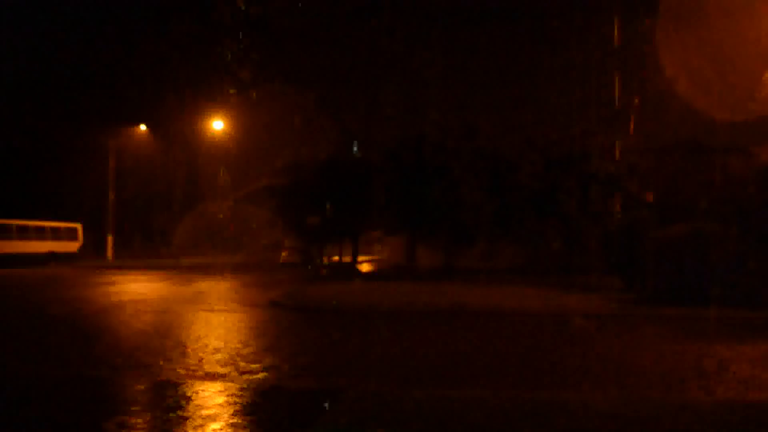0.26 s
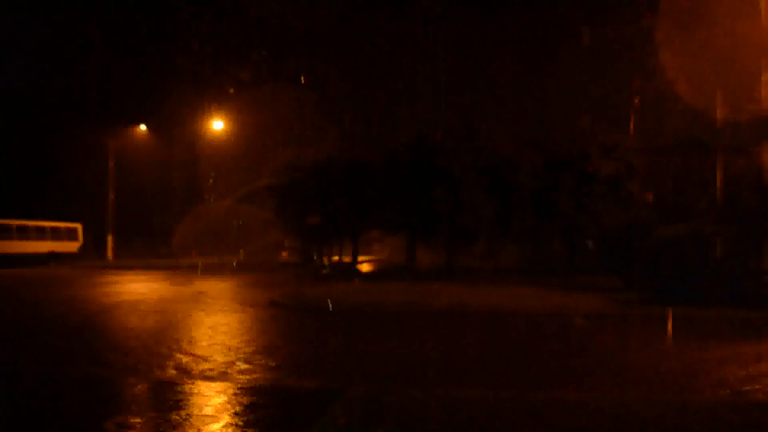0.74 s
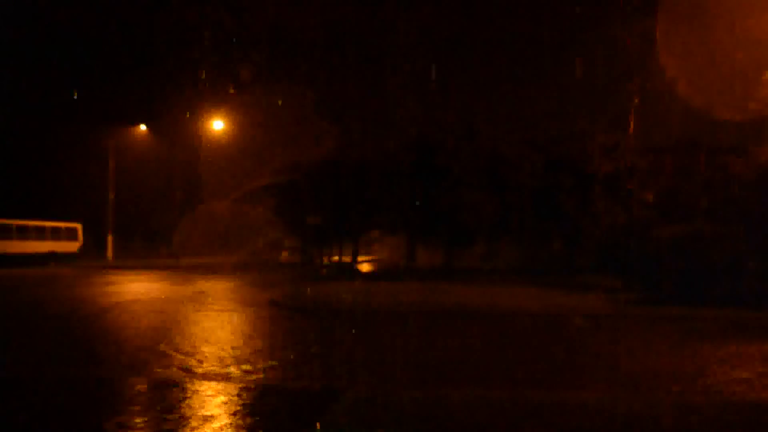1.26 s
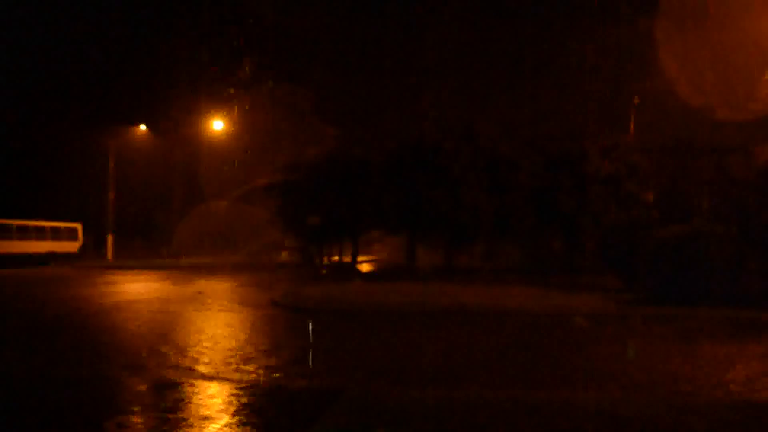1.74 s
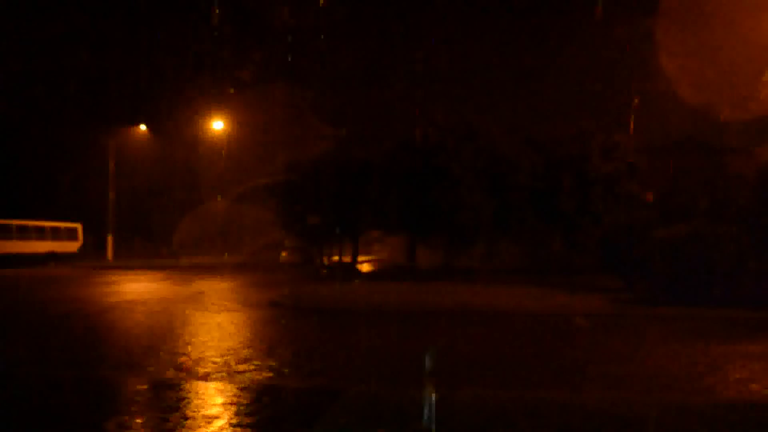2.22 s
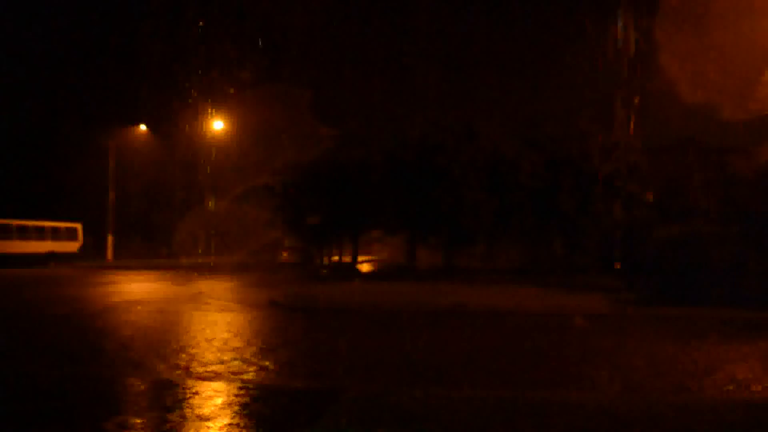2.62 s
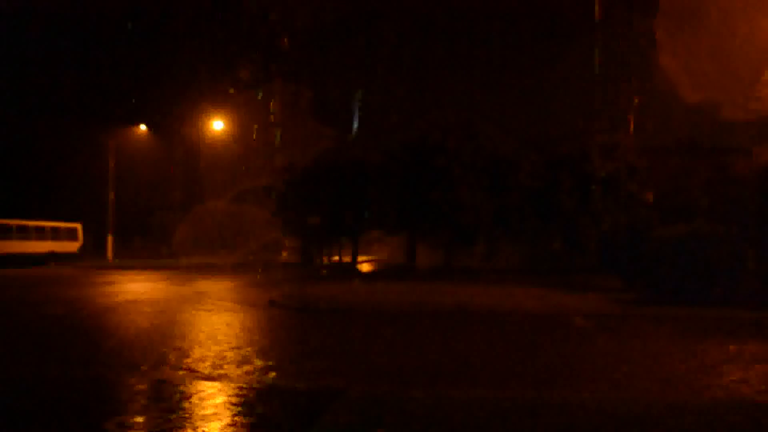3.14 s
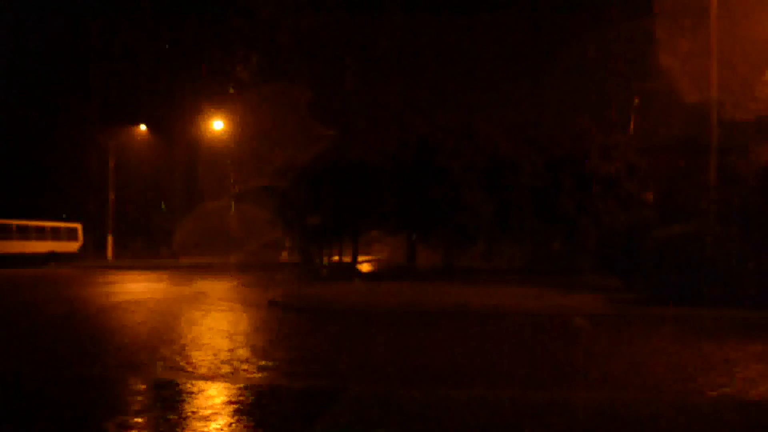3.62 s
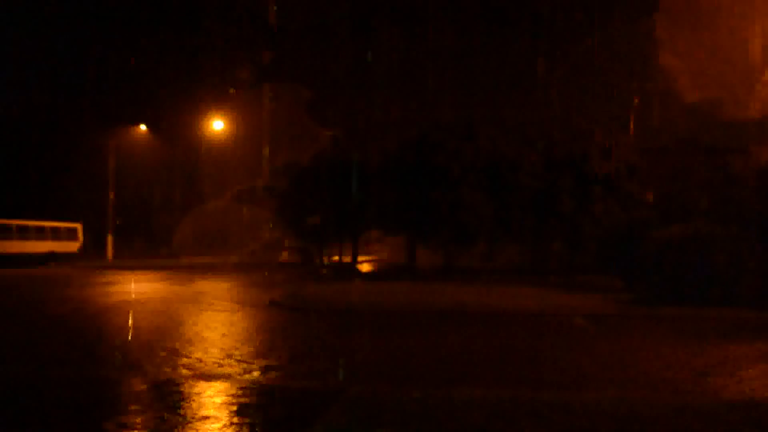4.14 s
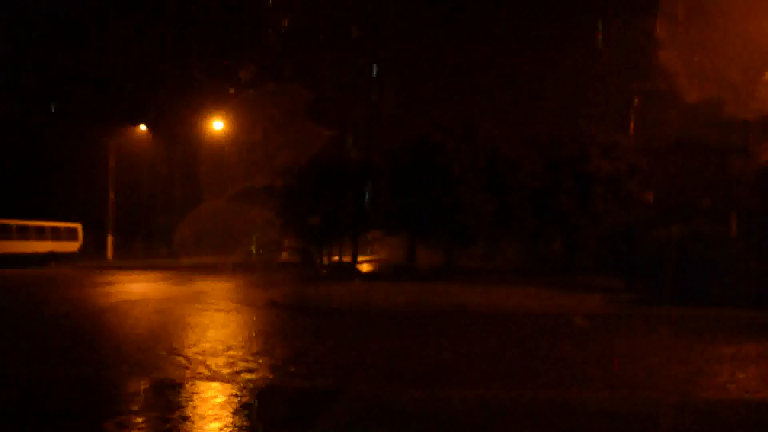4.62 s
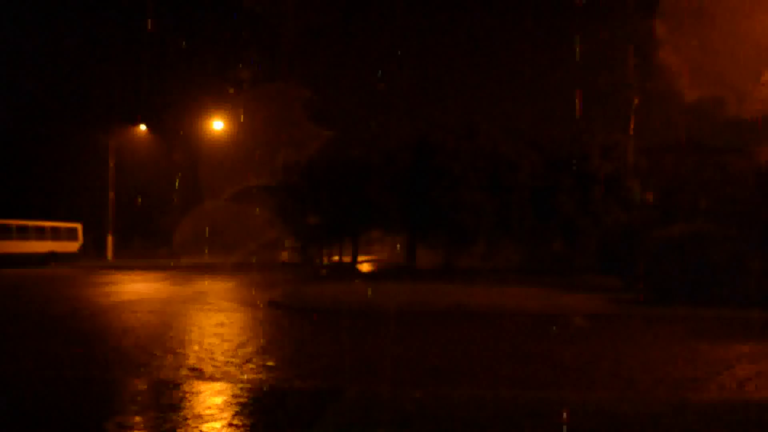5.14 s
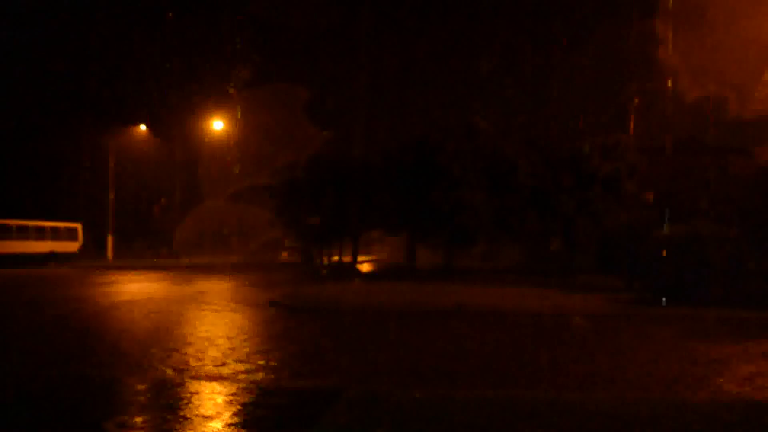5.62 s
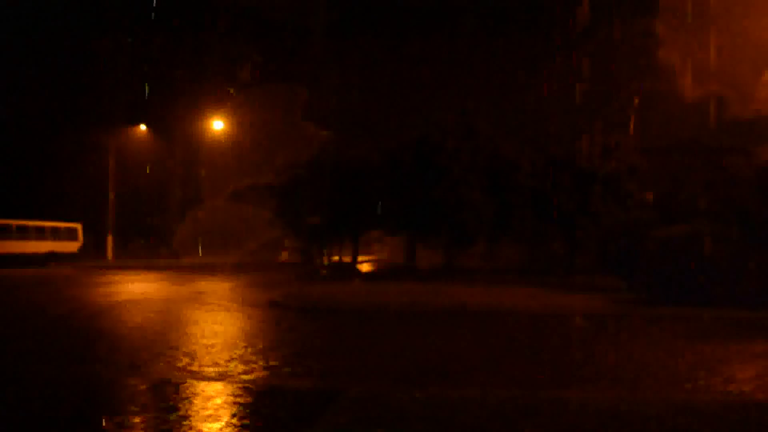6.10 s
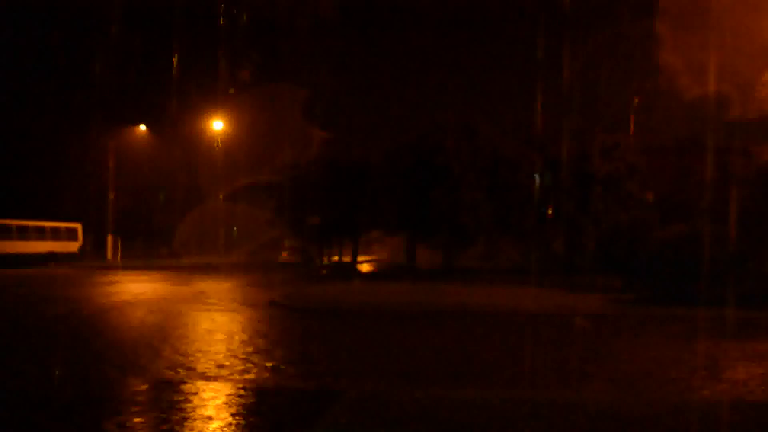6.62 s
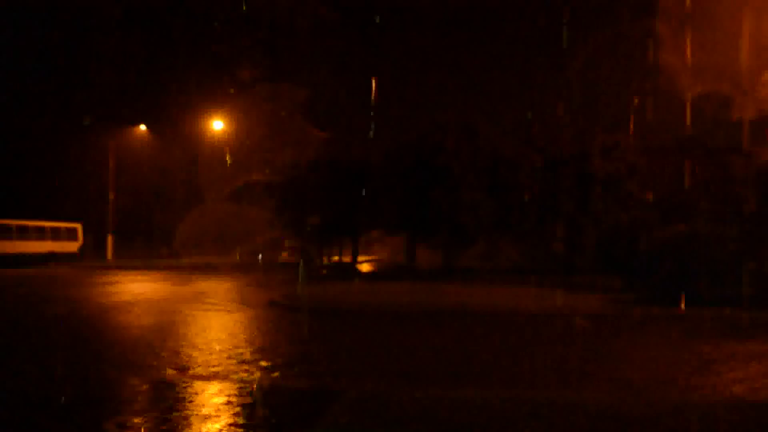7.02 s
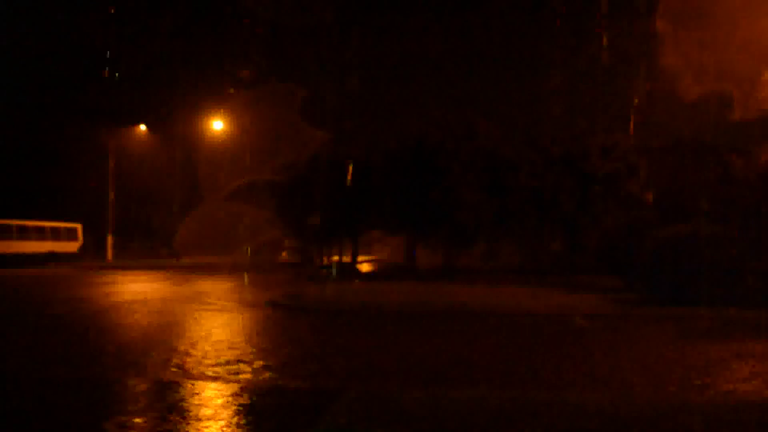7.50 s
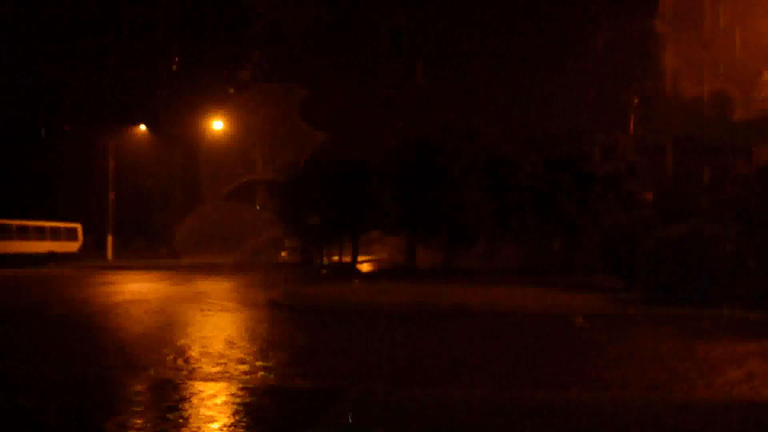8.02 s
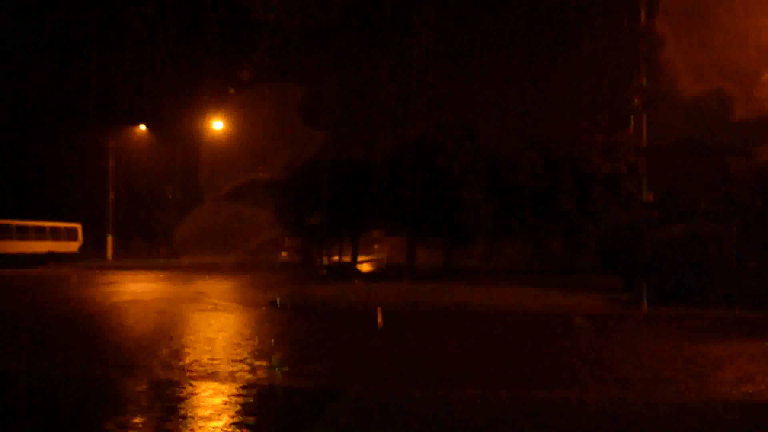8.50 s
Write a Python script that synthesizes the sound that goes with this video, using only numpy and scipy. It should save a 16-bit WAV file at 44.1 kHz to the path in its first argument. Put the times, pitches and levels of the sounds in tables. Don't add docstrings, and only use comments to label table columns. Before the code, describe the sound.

Heard from under a small shelter, distant rainfall stays constant while nearby drips crackle in front of it without rhythm. Heavier drops give a sharp mid-pitched smack with a little splash, some a blunt hollow plop in deep water, and lighter ones tick. Low wind pops touch the microphone around six to seven seconds. The small device sounds slightly boxy, lacking extreme treble.

```python
import sys
import numpy as np
from scipy import signal
from scipy.fft import rfft, irfft
from scipy.io import wavfile

SR = 44100
rng = np.random.default_rng(int(sys.argv[2]) if len(sys.argv) > 2 else 0)


def bounce(signal):
    frames = np.transpose(np.atleast_2d(signal))
    limited = np.clip(frames, -1, 1)
    pcm = np.round(limited * 32767).astype(np.int16)
    wavfile.write(sys.argv[1], SR, pcm)


def linear_from_db(decibels):
    return 10 ** (np.asarray(decibels, float) / 20)


N = 385875


def rms_one(x):
    return x / np.sqrt(np.mean(x ** 2) + 1e-20)


def in_time(rows):
    time_s, value = np.transpose(rows)
    return np.interp(np.arange(N) / SR, time_s, value)


def response(points, size):
    point_hz, point_db = np.transpose(points)
    bin_hz = np.maximum(np.fft.rfftfreq(size, 1 / SR), 1)
    return linear_from_db(np.interp(np.log(bin_hz), np.log(point_hz), point_db))


def band(x, hz, width_hz):
    r = np.exp(-np.pi * width_hz / SR)
    numerator = np.array([1, 0, -1]) * (1 - r * r) / 2
    return signal.lfilter(numerator, [1, -2 * r * np.cos(2 * np.pi * hz / SR), r * r], x)


def lowpass(x, order, hz):
    return signal.sosfilt(signal.butter(order, hz, fs=SR, output="sos"), x)


def highpass(x, hz):
    return signal.sosfilt(signal.butter(2, hz, "high", fs=SR, output="sos"), x)


def drift(rate_hz):
    r = np.exp(-2 * np.pi * rate_hz / SR)
    return rms_one(signal.lfilter([1], [1, -2 * r, r * r], rng.standard_normal(N + SR))[SR:])


def near(hz, spread):
    return hz * np.exp(spread * rng.standard_normal())


# (time [s], level [dB])
RAIN_LEVEL = [(0.0, -31.5), (3.58, -32), (4.09, -31), (5.82, -32.5), (8.14, -31.5), (8.75, -32.5)]
# (frequency [Hz], density [dB per Hz])
RAIN_COLOUR = [(25, -29), (120, -20), (267, -9.5), (749, -5.5), (900, -8.5), (1160, -6.5), (1750, -7),
               (2650, -4), (3010, -1), (3520, -4.5), (4650, -6), (12500, -7.5)]


def far_rain():
    drop_sizes = linear_from_db(6.9 * np.minimum(rng.exponential(1, N), 4.2)) * rng.choice([-1, 1], N)
    drops_per_s = 3000
    patter = rms_one(drop_sizes * (rng.random(N) < drops_per_s / SR))
    mixed = linear_from_db(-4.0) * patter + rng.standard_normal(N)
    hiss = irfft(rfft(mixed) * response(RAIN_COLOUR, N), N)
    return linear_from_db(in_time(RAIN_LEVEL) - 1.88 + 0.8 * drift(16.0)) * rms_one(hiss)


# (time [s], level [dB])
WIND_LEVEL = [(0, -57), (.3, -63), (3.3, -64.5), (4.2, -75), (5.9, -65), (6.1, -56), (6.4, -64), (7.0, -58),
              (7.45, -56), (7.6, -76), (8.45, -64.5), (8.6, -56), (8.75, -55)]
# (time [s], peak level [dB], frequency [Hz])
WIND_POPS = [(6.032, -39, 120), (6.047, -30, 150), (6.725, -43, 80), (6.902, -35, 330), (6.928, -37, 290),
             (6.994, -37, 110), (7.193, -30.5, 150), (7.222, -33, 60), (7.238, -28, 190),
             (7.292, -27.5, 192), (7.306, -36, 120), (8.567, -43, 90), (8.686, -43, 130)]


def wind():
    rumble = rms_one(band(rng.standard_normal(N), 51, 91))
    out = linear_from_db(in_time(WIND_LEVEL) - 1.5 + 4.0 * drift(6.0)) * rumble
    t = np.arange(SR // 20) / SR
    for time_s, peak_db, hz in WIND_POPS:
        start = round(time_s * SR)
        envelope = np.exp(-2.6 * hz * t) * (1 - np.exp(-14 * hz * t))
        out[start:start + len(t)] += linear_from_db(peak_db + 4.5) * np.sin(2 * np.pi * hz * t) * envelope
    return highpass(out, 35)


# (time [s], frequency [Hz], level [dB])
ENGINE = [
    (0, 79, -61),
    (.4, 82, -70),
    (1.1, 92, -70),
    (1.9, 92, -70),
    (2.9, 90, -70.5),
    (3.8, 85, -78),
    (4.3, 84, -85),
    (8.75, 84, -90),
]


def drone():
    time_s, hz, level_db = np.transpose(ENGINE)
    wavering_hz = in_time(np.c_[time_s, hz]) * (1 + 0.0101 * drift(1.24))
    angle = 2 * np.pi * np.cumsum(wavering_hz) / SR
    tone = np.sin(angle) + linear_from_db(-1.5) * np.sin(3 * angle)
    return np.sqrt(2) * linear_from_db(in_time(np.c_[time_s, level_db])) * tone


# (delay [ms], level [dB], favoured frequency [Hz], width [Hz])
WALL_ECHOES = [(2, -12.5, 940, 11400), (4.9, 8.5, 2700, 1300), (6, -12, 5000, 7900), (7.5, 3, 2300, 2000),
               (6.3, -6.5, 6300, 24000), (5.16, -5.0, 1500, 2200), (9.2, -10, 2480, 820),
               (11, -6, 2170, 1800), (14.3, -9.5, 2300, 1200)]


def shelter():
    first_arrival_db, screened_share = 0.2, 0.2
    scatter_db, scatter_t60_s = -26, 0.092
    t = np.arange(SR // 8) / SR
    click = 1.0 * (t == 0)
    out = linear_from_db(first_arrival_db) * (click - screened_share * band(click, 1900, 820))
    out = out + linear_from_db(scatter_db - 60 * t / scatter_t60_s) * rng.standard_normal(len(t)) * (t > .0006)
    for delay_ms, echo_db, hz, width_hz in WALL_ECHOES:
        echo_hz = near(hz, 0.049)
        echo = click
        for _ in range(3):
            echo = band(echo, echo_hz, width_hz)
        spot_db = 6.6 * (rng.random() - .5)
        out = out + linear_from_db(echo_db + spot_db) * np.roll(echo, round(delay_ms * SR / 1000))
    return out


def impact(hz):
    t = np.arange(SR // 16) / SR
    swell_s = 0.0044
    swell = (t / swell_s * np.exp(1 - t / swell_s)) ** 2
    spray = linear_from_db(7.0 * rng.standard_normal(len(t))) * rng.standard_normal(len(t)) * swell
    spray_db = np.interp(hz, [2500, 5500, 8000], [-44.0, -31.0, -25.0]) + 10.0 * (rng.random() - .5)
    click_db = np.interp(hz, [3000, 6000], [-1, -17])
    source = linear_from_db(spray_db) * spray + linear_from_db(click_db) * (t == 0)
    top_hz = min(hz * np.interp(hz, [1200, 2700, 5000], [2.0, 1.4, 1.6]), .45 * SR)
    width_hz = hz * np.interp(hz, [1200, 2700, 6000], [.7, .72, .7])
    soft = lowpass(signal.fftconvolve(source, shelter()), 3, top_hz)
    heard = highpass(band(soft, hz, width_hz), 0.48 * hz)
    return heard / np.sqrt(np.mean(heard[:530] ** 2))


PITCHES_HZ = np.geomspace(1000, 9500, num=40)


def strike(time_s, level_db, hz):
    spots = 4
    nearest = np.argmin(np.abs(np.log(hz[:, None] / PITCHES_HZ)), axis=1)
    heard = [[impact(pitch_hz) for pitch_hz in PITCHES_HZ] for _ in range(spots)]
    starts = np.round(time_s * SR).astype(int)
    out = np.zeros(N + SR)
    for turn, (start, gain, pitch) in enumerate(zip(starts, linear_from_db(level_db), nearest)):
        one = heard[turn % spots][pitch]
        out[start:start + len(one)] += gain * one
    return out[:N]


def tiny_drips():
    time_chance, level_chance, pitch_chance = rng.random((900, 3)).T
    level_db = -45.0 - 4.9 * np.log(level_chance + 0.2)
    return np.array([time_chance * (N - 1) / SR, level_db, 1700 * 5.5 ** pitch_chance])


# (time [s], rms level [dB], centre [Hz])
WEAK_PATTER = [(0.01, -36.5, 2100), (0.0846, -35.0, 2100), (0.1756, -33.5, 2700), (0.5525, -35.0, 2100),
               (0.5674, -36.5, 2100), (1.0172, -36.5, 2100), (1.2218, -37, 2100), (1.3316, -34, 2100),
               (1.3729, -35, 2700), (1.447, -32.5, 2700), (1.5088, -34, 2700), (1.537, -37, 2100),
               (1.569, -34, 2700), (1.619, -35, 2100), (1.712, -34, 2700), (1.783, -34, 2700),
               (1.8856, -34.5, 2100), (2.393, -35, 2700), (2.5485, -33, 2700), (2.6552, -40, 2100),
               (2.7504, -37, 2100), (2.7623, -34, 2100), (2.8818, -36.5, 2100), (3.0339, -31, 2700),
               (3.2718, -35, 2700), (3.4848, -31.5, 2700), (3.5431, -35, 2700), (3.687, -38, 2100),
               (3.716, -31, 2100), (3.8874, -35, 2700), (4.057, -34, 2100), (4.2707, -37.0, 2100),
               (4.3352, -35, 2700), (4.6052, -32.5, 2700), (4.708, -32.5, 2100), (4.743, -33, 2700),
               (4.7906, -37.0, 2100), (4.9263, -31.5, 2700), (5.0226, -43, 2100), (5.0972, -34, 2100),
               (5.228, -34, 2100), (5.345, -34, 2700), (5.3598, -32.5, 2700), (5.486, -34.5, 2100),
               (5.5487, -32, 2700), (5.71, -33, 2700), (5.8992, -33, 2700), (5.9306, -37, 2100),
               (6.1627, -34, 2700), (6.3892, -34, 2700), (6.4563, -34.5, 2100), (6.577, -37, 2700),
               (6.593, -37, 2100), (7.024, -31, 2700), (7.0875, -33, 2700), (7.21, -35, 2700),
               (7.837, -36, 2100), (8.1784, -37.0, 2100), (8.2592, -37, 2100), (8.7226, -37, 2100),
               (0.0148, -36, 4500), (0.1654, -39, 4500), (0.2838, -30.5, 3500), (0.3728, -35, 4500),
                 (0.505, -38, 3500), (0.562, -35, 4500), (0.5836, -39, 5800), (0.791, -36, 5800),
                 (0.8694, -33, 4500), (0.944, -30.5, 4500), (1.1362, -32, 3500), (1.1805, -35, 3500),
                 (1.219, -40, 5800), (1.274, -33, 3500), (1.5467, -38, 4500), (1.6187, -35, 4500),
                 (1.8589, -37, 3500), (1.8997, -36, 3500), (2.1745, -37, 4500), (2.224, -35, 4500),
                 (2.2729, -37, 4500), (2.3834, -34, 4500), (2.429, -33.5, 5800), (2.4921, -35.5, 5800),
                 (2.6064, -37, 4500), (2.6508, -31, 4500), (2.786, -32.5, 4500), (2.9491, -35, 4500),
                 (3.1064, -34, 3500), (3.128, -34, 4500), (3.155, -35, 4500), (3.598, -34.0, 5760),
                 (3.716, -32, 5780), (3.982, -37, 4500), (4.135, -36, 5760), (4.161, -35, 5740),
                 (4.401, -36.0, 5850), (4.5434, -33, 3500), (4.851, -34, 5740), (4.866, -35, 3500),
                 (5.0975, -36, 5800), (5.1599, -33.5, 3500), (5.7715, -33, 3500), (5.975, -32.0, 4500),
                 (6.6246, -33, 4500), (6.741, -43, 5750), (7.1664, -36, 4500), (7.2437, -28.5, 2700),
                 (7.3066, -35, 3500), (7.5599, -32, 2700), (7.59, -31.5, 3500), (7.6944, -32.5, 2700),
                 (7.705, -37, 2700), (7.7609, -31.5, 3500), (7.9875, -33, 2700), (8.1627, -37, 4500),
                 (8.2716, -32, 3500), (8.3298, -32.5, 2700), (8.3503, -37, 3500), (8.6174, -36, 2700),
               (0.0185, -35.0, 9000), (0.167, -34, 9000), (0.1943, -35, 9000), (0.276, -36, 9000),
                  (0.285, -37.0, 7200), (0.652, -39, 7200), (0.8552, -35.5, 7200), (1.129, -33.5, 9000),
                  (1.3065, -37, 7200), (1.37, -36, 9000), (1.4164, -37, 7200), (1.5357, -38, 9000),
                  (1.7773, -33.5, 9000), (1.8341, -35.0, 9000), (1.8848, -39, 7200), (1.8991, -32, 9000),
                  (2.2242, -34.5, 9000), (2.341, -33, 9000), (2.58, -35, 7200), (2.7868, -36, 9000),
                  (2.8182, -37, 7200), (2.9576, -37, 9000), (3.0331, -37.0, 9000), (3.1758, -32, 7200),
                  (3.2433, -41, 7200), (3.3423, -34, 9000), (3.3556, -36.0, 9000), (3.4841, -33, 9000),
                  (3.8939, -35, 9000), (4.1023, -37, 7200), (4.2698, -39, 9000), (4.2819, -34, 9000),
                  (4.6005, -37, 7200), (4.6219, -31.5, 9000), (4.7832, -37, 7200), (4.8647, -39, 9000),
                  (5.3052, -39, 7200), (5.3553, -34.5, 7200), (5.4241, -36.5, 9000), (5.5438, -34, 9000),
                  (5.6154, -39, 9000), (6.2203, -39, 9000), (6.5397, -37, 9000), (6.6167, -36, 9000),
                  (6.9298, -37, 5800), (7.093, -34, 9000), (7.4345, -36, 9000), (7.5223, -35.0, 7200),
                  (7.5598, -34, 9000), (7.7922, -38, 5800), (7.833, -34, 5800), (7.9573, -39, 7200),
                  (7.9867, -37, 7200), (8.015, -36, 5800), (8.185, -35, 5800), (8.3204, -32, 9000),
                  (8.3932, -38, 5800), (8.6454, -36, 9000), (8.6703, -39, 7200), (8.7285, -36.0, 9000),
               (6.4402, -24, 4100), (4.2967, -28, 3700), (3.222, -29, 4600), (2.96, -34, 3200),
                 (7.5, -35, 8800), (1.294, -26.5, 2800), (0.328, -31, 4200), (6.4415, -28, 9400),
                 (6.862, -33, 9000), (4.305, -34.5, 9000), (6.115, -39, 6200)]


def weak_drips():
    return np.array(WEAK_PATTER).T


# (time [s], smack rms level [dB], smack [Hz], splash re smack [dB])
FAT_DRIPS = [(0.1415, -24.5, 2880, -7), (0.9605, -29, 2780, -1), (1.1667, -25.5, 2370, -17),
             (1.2852, -26, 2690, -25), (1.3087, -24.5, 2510, -20), (1.5563, -27.5, 2370, -8),
             (1.8209, -24, 2630, -13), (1.9395, -26.5, 2596, -9), (2.294, -22, 2800, -20),
             (2.713, -18.5, 2746, -17), (3.184, -26, 2770, -11), (3.222, -24, 2720, -4),
             (4.1685, -25.5, 2590, -10), (4.6997, -26.5, 2940, -5.5), (4.7628, -26, 2570, -6),
             (5.216, -28, 2510, -12), (5.2503, -25.5, 3020, -2), (5.6321, -25.5, 2540, -13),
             (5.692, -24.5, 2630, -13), (6.0651, -24, 2400, -28), (6.2051, -24.5, 2520, -8),
             (6.4409, -21.5, 2850, -7), (6.6991, -23.5, 2860, -3.5), (7.255, -25.5, 2680, -7.5),
             (7.3588, -26, 2710, -11), (7.6292, -23, 2720, -14), (7.733, -26.5, 2540, -22),
             (8.046, -25, 2550, -8.5), (8.5013, -26, 2610, -5), (8.6531, -25, 3050, -4.5)]
# (time [s], smack rms level [dB], splash re smack [dB], splash [Hz])
FILM_DRIPS = [(0.3183, -35, 1, 6000), (0.7585, -29.5, 0.5, 4700), (1.1082, -31.5, 1, 6630),
              (1.474, -27, -8, 8600), (1.983, -28, -1, 4750), (2.0907, -28.5, -3, 5200),
              (2.8284, -28.5, -2, 6000), (2.96, -29.5, -3.5, 5000), (4.0652, -37, 8.5, 5400),
              (4.239, -30, -1, 7600), (4.256, -29.5, -14, 5530), (4.297, -30.5, 1.5, 5600),
              (4.4145, -30.5, -2, 5200), (4.565, -28, -8, 8100), (4.904, -25.5, -3, 5140),
              (5.0003, -28.5, -3, 5600), (5.1278, -27.5, -6, 6800), (5.2636, -29, -2, 5800),
              (5.3146, -29.5, -4.5, 6150), (5.915, -29, 0, 5750), (6.6504, -27.5, -5.5, 4580),
              (6.667, -31, -3, 7500), (6.8983, -36, 3, 6400), (7.331, -28, -5, 6100),
              (7.5887, -35, -1, 6870), (7.9393, -28.5, -8, 5000), (8.206, -26.5, -5, 6650),
              (8.361, -30, -1.5, 8680), (8.434, -28, -4.5, 8000)]
# (time [s], smack rms level [dB], smack [Hz])
MIDDLING_DRIPS = [(0.357, -29, 2690), (0.445, -29, 2900), (0.4668, -28, 3460), (0.733, -30.5, 2260),
                  (0.818, -28.5, 3030), (0.9292, -27.5, 2900), (1.1806, -30, 2640), (1.42, -28.5, 3080),
                  (1.5845, -28.5, 2680), (1.7237, -26.5, 2560), (1.852, -30, 2400), (2.1768, -27.5, 2820),
                  (3.0603, -29, 2290), (3.529, -26, 2990), (3.5576, -30, 2700), (3.873, -29, 2600),
                  (3.9583, -28, 2910), (4.0106, -28, 2650), (4.2097, -27.5, 2910), (4.3526, -27.5, 2830),
                  (3.929, -30, 2390), (4.371, -30.5, 2230), (6.0034, -28.5, 2900), (7.014, -27, 2720),
                  (7.063, -29, 2630), (7.222, -28, 2320), (7.771, -31, 3300), (8.107, -29, 2390),
                  (8.3013, -29.5, 2910), (8.5249, -28.5, 2720)]
# (time [s], smack rms level [dB], smack [Hz], plop re smack [dB], splash re smack [dB])
PUDDLE_DRIPS = [(0.49, -23.5, 2130, -2.5, -10), (0.5106, -36, 1770, 10.5, 3), (0.558, -31, 2830, -11, -4),
                (0.944, -29.5, 2570, -8.5, -14), (1.9515, -28, 2560, -11, 0),
                (2.0702, -27.5, 2490, -10, -25), (2.514, -27.5, 3120, -17, -21),
                (2.527, -30.5, 2330, -12, -4), (2.9117, -27, 1900, -5, -10), (3.666, -28, 2750, -12, -7),
                (3.9072, -31.5, 2960, -7.5, 1), (4.086, -29.5, 2370, -5.5, -7),
                (4.135, -28.5, 2360, -11, -17), (4.964, -23, 2500, -9.5, -26), (5.0755, -27.5, 2030, -5, 2),
                (5.9803, -29, 2170, -8.5, -6), (6.8233, -25.5, 2200, -1, -11),
                (6.8672, -24.5, 2410, -5.5, 0), (6.9216, -28.5, 2040, -7.5, -6.5),
                (7.446, -29, 2450, -13, -3.5), (7.8158, -22, 2550, -16, -19), (8.185, -39, 2000, 0.5, 3),
                (8.3857, -29, 2610, -16, -6), (8.6702, -27.5, 2610, -13, -16)]


def heavy_drips():
    paving_splash_hz, puddle_splash_hz, film_smack_hz = 5600, 7200, 3050
    middling_splash_db = -9.5
    rows = [(s, db, hz, splash_db, near(paving_splash_hz, 0.18)) for s, db, hz, splash_db in FAT_DRIPS]
    rows += [(s, db, hz, middling_splash_db, near(paving_splash_hz, 0.24)) for s, db, hz in MIDDLING_DRIPS]
    rows += [(s, db, hz, splash_db, near(puddle_splash_hz, .1)) for s, db, hz, _, splash_db in PUDDLE_DRIPS]
    rows += [(s, db, near(film_smack_hz, .05), splash_db, hz) for s, db, splash_db, hz in FILM_DRIPS]
    time_s, smack_db, smack_hz, splash_db, splash_hz = np.transpose(rows)
    thock_db = -16 + 1 * rng.standard_normal(len(time_s))
    thock_hz = 1260 * np.exp(.06 * rng.standard_normal(len(time_s)))
    smacks = np.array([time_s, smack_db, smack_hz])
    thocks = np.array([time_s, smack_db + thock_db, thock_hz])
    splashes = np.array([time_s, smack_db + splash_db, splash_hz])
    return np.hstack([smacks, thocks, splashes])


# (time [s], rms level [dB], centre [Hz])
LIGHT_DRIPS = [(0.1754, -38, 6830), (0.6352, -33.5, 5750), (0.792, -31, 3600), (1.2626, -31, 8200),
               (1.334, -32.5, 5180), (1.799, -30, 3920), (2.188, -29.5, 4050), (2.4135, -32, 3400),
               (2.499, -33, 7200), (2.55, -34, 5000), (3.0338, -37, 4300), (3.1014, -32.5, 5000),
               (3.1259, -34, 8660), (3.4946, -33, 3300), (3.5124, -30.5, 8800), (3.623, -32, 5600),
               (3.648, -30.5, 7500), (3.738, -28.5, 3860), (3.8066, -31, 3510), (4.0318, -30, 3600),
               (5.4375, -29.5, 3900), (5.497, -33, 3450), (6.102, -29, 7700), (6.1617, -33, 4470),
               (6.22, -30.5, 3500), (6.3435, -32, 4700), (6.992, -30.5, 3600), (7.195, -35, 8180),
               (7.531, -30.5, 3400), (7.688, -31, 7500)]


def light_drips():
    return np.transpose(LIGHT_DRIPS)


# (time [s], centre [Hz])
SOFT_DRIPS = [(0.4217, 3970), (0.841, 4020), (1.049, 3600), (1.1984, 2680), (1.222, 3700), (1.393, 3060),
              (1.494, 4440), (2.0156, 2800), (2.15, 2600), (2.7677, 4000), (2.894, 4460), (4.525, 2700),
              (4.7484, 4400), (5.017, 4100), (5.0436, 3300), (5.548, 4750), (5.7833, 2800), (5.889, 3840),
              (6.0243, 3460), (6.409, 2900), (6.5338, 4040), (6.577, 3700), (6.84, 3300), (7.178, 3020),
              (7.4, 3400), (7.561, 4740), (7.651, 3740), (8.03, 3400), (8.123, 3500), (8.1466, 3920)]


def soft_drips():
    time_s, hz = np.transpose(SOFT_DRIPS)
    level_db = np.full(len(time_s), -32.5)
    return np.array([time_s, level_db, hz])


def drips():
    contacts = [heavy_drips(), light_drips(), soft_drips(), tiny_drips(), weak_drips()]
    return strike(*np.hstack(contacts))


# (delay [ms], level [dB], favoured frequency [Hz], width [Hz])
PLOP_RETURNS = [(2.2, -6, 1500, 1500), (5.2, -.5, 1130, 240), (5.6, 2, 2100, 600), (7.6, -.5, 1200, 260),
                (8.2, 0, 2100, 500), (13.5, -11, 1300, 600)]


def plops():
    plop_hz, plop_width_hz, plop_top_hz = 1380, 800, 2300
    time_s, smack_db, _, plop_db, _ = np.transpose(PUDDLE_DRIPS)
    t = np.arange(SR // 20) / SR
    out = np.zeros(N + SR)
    blunt = lowpass(1.0 * (t == 0), 2, plop_top_hz)
    for start, level_db in zip(np.round(time_s * SR).astype(int), smack_db + plop_db):
        pulse = band(blunt, near(plop_hz, .06), plop_width_hz)
        heard = pulse
        for delay_ms, echo_db, hz, width_hz in PLOP_RETURNS:
            echo = np.roll(band(pulse, hz, width_hz), round(delay_ms * SR / 1000))
            heard = heard + linear_from_db(echo_db + 2 * rng.standard_normal()) * echo
        out[start:start + len(t)] += linear_from_db(level_db) * heard / np.sqrt(np.mean(heard[:530] ** 2))
    return out[:N]


def scene():
    return -(far_rain() + wind() + drone() + drips() + plops())[None]


def low_pass(x):
    return signal.sosfilt(signal.butter(12, 15300, fs=SR, output="sos"), x)


# (frequency [Hz], width [Hz], level re direct [dB])
HOUSING_MODES = [(1073, 50, -1.5), (1186, 76, 2.5), (2075, 90, -6.5), (3330, 115, -4), (4247, 115, -0.5)]
# (frequency [Hz], share lost [0-1])
NARROW_DIPS = [(1292, 0.26), (2290, 0.25), (2850, 0.23), (3165, 0.53), (3410, 0.42), (3580, 0.19),
               (5020, 0.28)]
# (frequency [Hz], level [dB])
MIC_RESPONSE = [(6500, 1.5), (7300, -1), (7850, -5), (8500, 2), (9700, 1.5), (10500, -6), (11400, -17.5),
                (11750, -34), (12000, -70)]
# (frequency [Hz], level [dB])
MIRROR_LEAK = [(12000, -2), (13500, -14), (14500, -29), (15000, -37), (15400, -60)]


def record(dry):
    first_rate_hz, dip_width_hz = 24000, 70
    housed = dry + sum(linear_from_db(mode_db) * band(dry, hz, width_hz) for hz, width_hz, mode_db in HOUSING_MODES)
    housed = housed - sum(share * band(housed, hz, dip_width_hz) for hz, share in NARROW_DIPS)
    heard = rfft(housed) * response(MIC_RESPONSE, N)
    bins = np.arange(heard.shape[1])
    mirror_bin = round(first_rate_hz * N / SR) - bins
    mirror = np.conj(heard[:, np.clip(mirror_bin, 0, len(bins) - 1)])
    leaked = np.where(bins > mirror_bin, mirror * response(MIRROR_LEAK, N), heard)
    mix = irfft(leaked, N)
    return low_pass(mix)


dry = scene()
out = record(dry)
bounce(out)
```